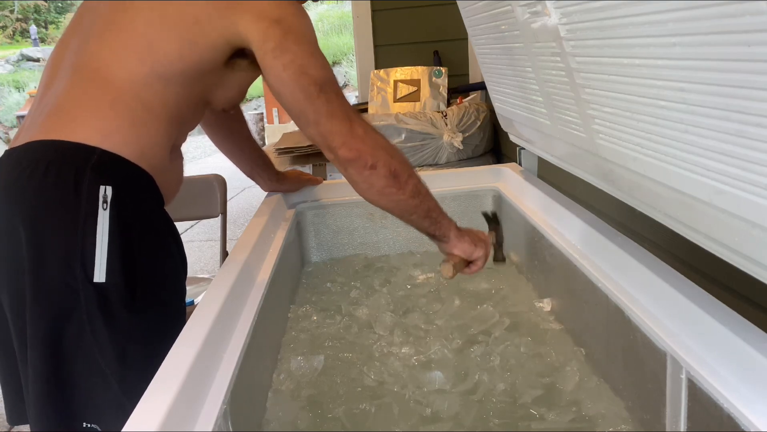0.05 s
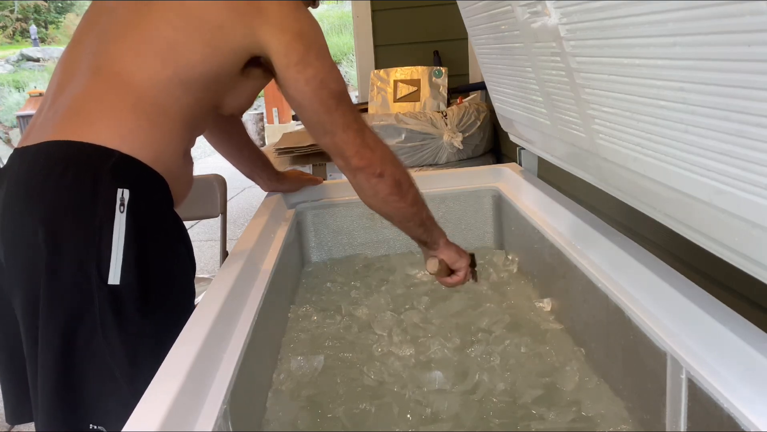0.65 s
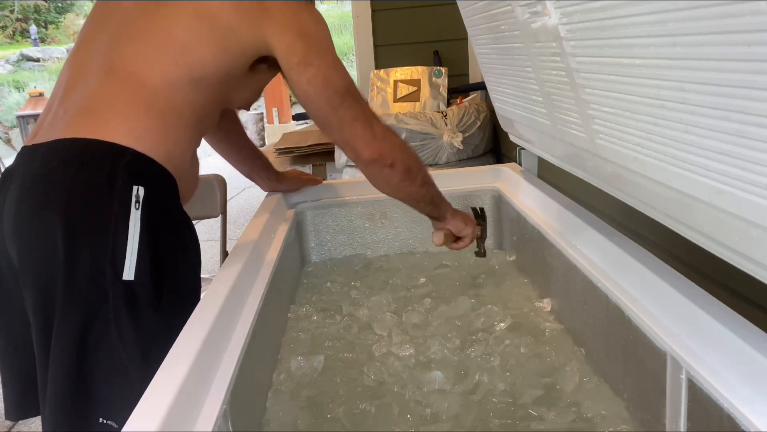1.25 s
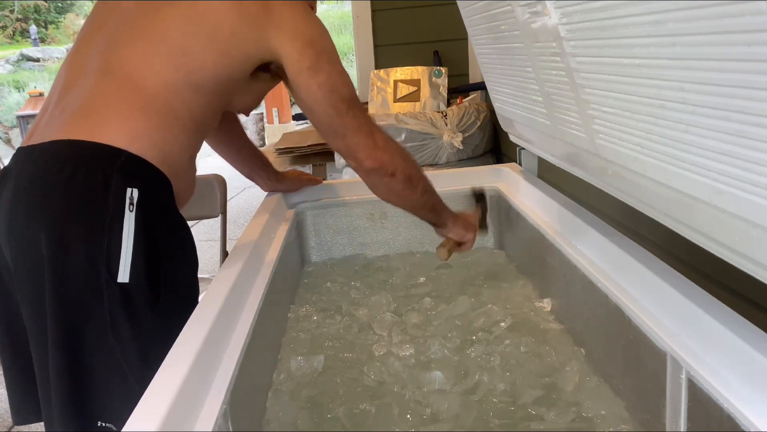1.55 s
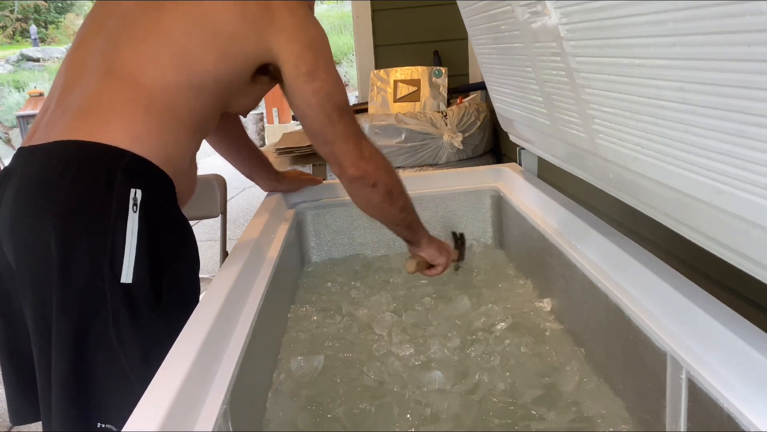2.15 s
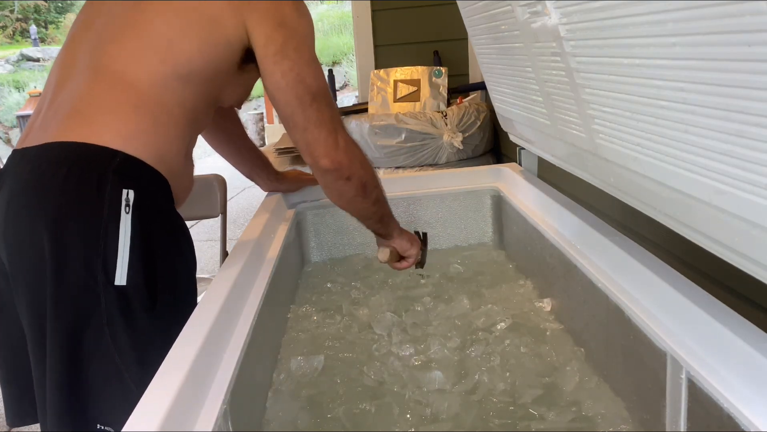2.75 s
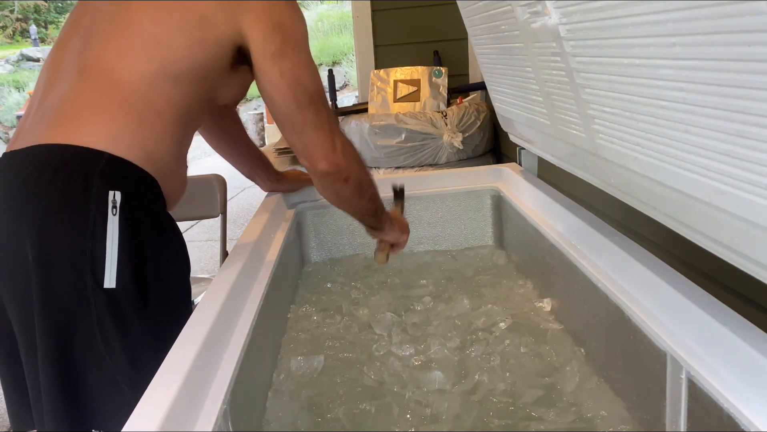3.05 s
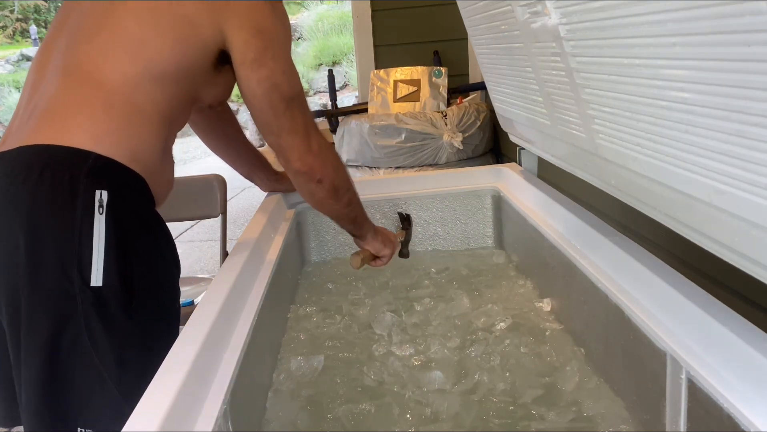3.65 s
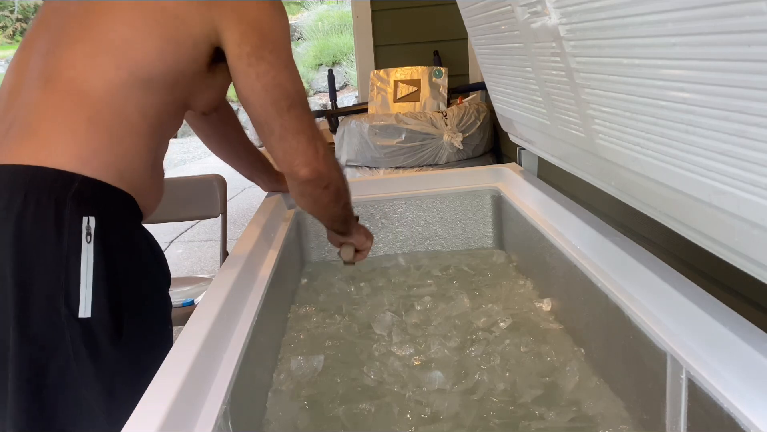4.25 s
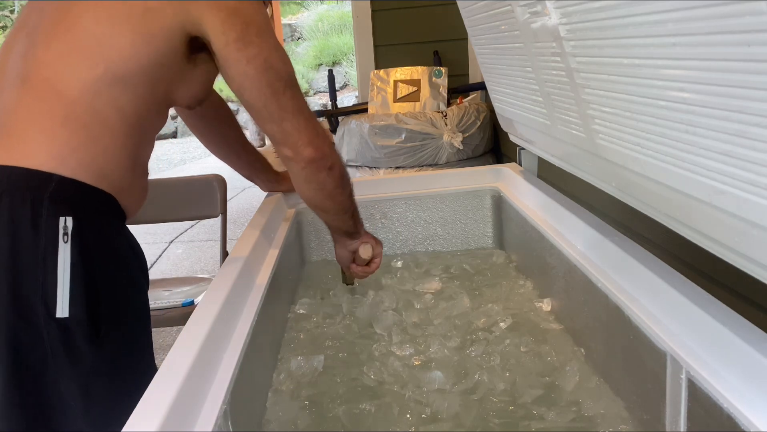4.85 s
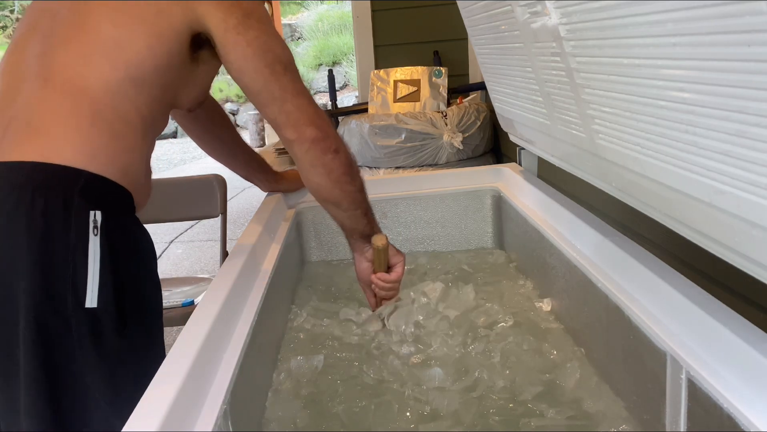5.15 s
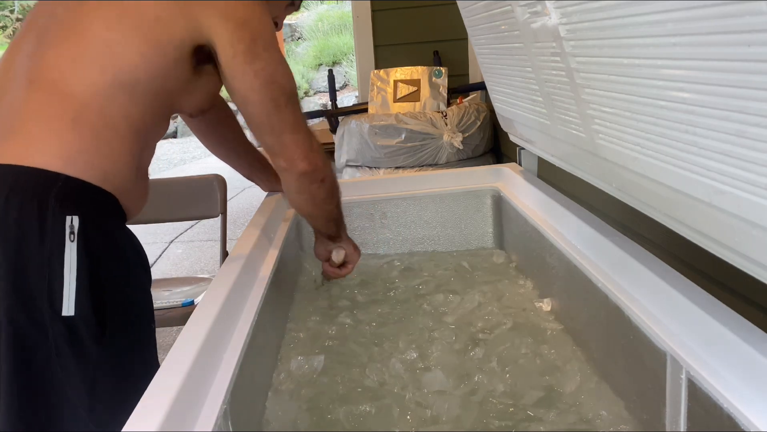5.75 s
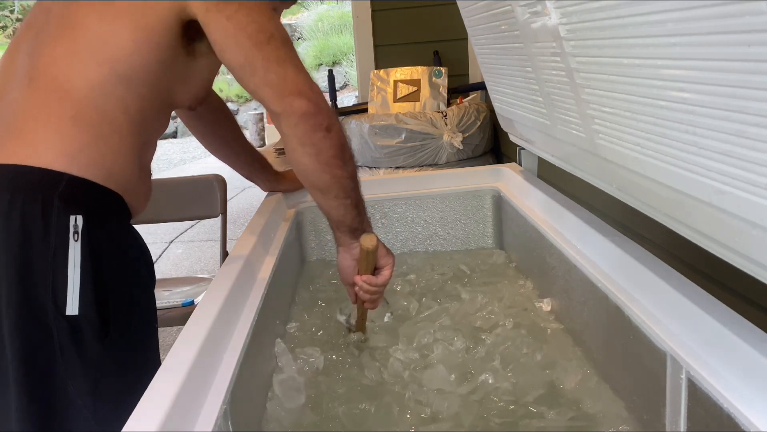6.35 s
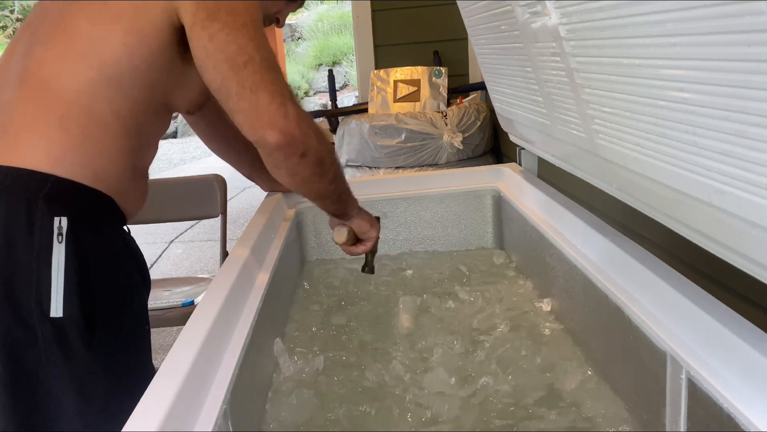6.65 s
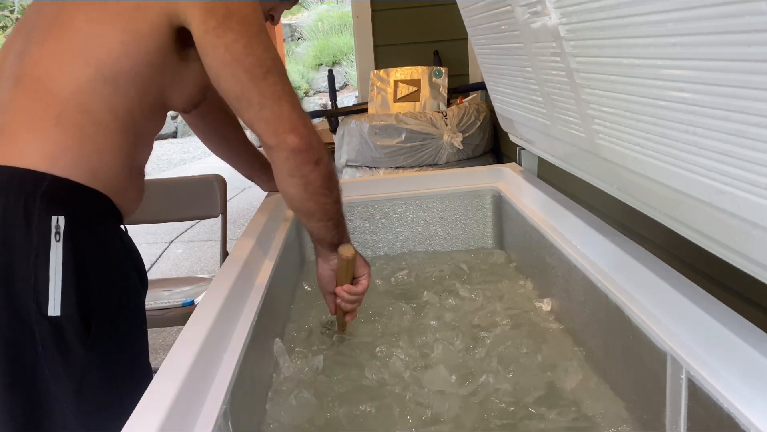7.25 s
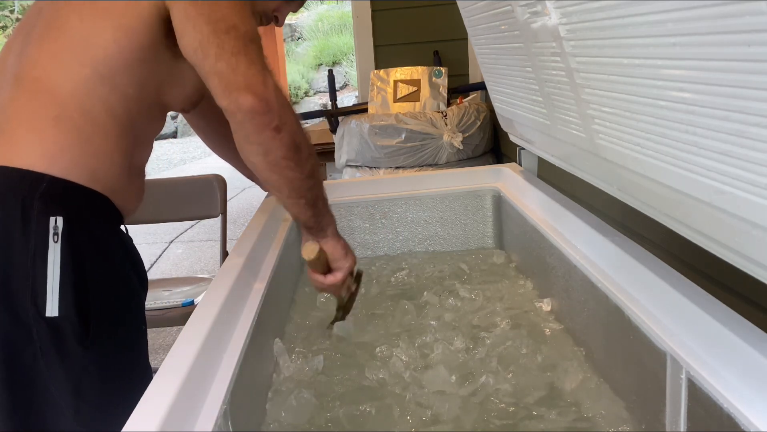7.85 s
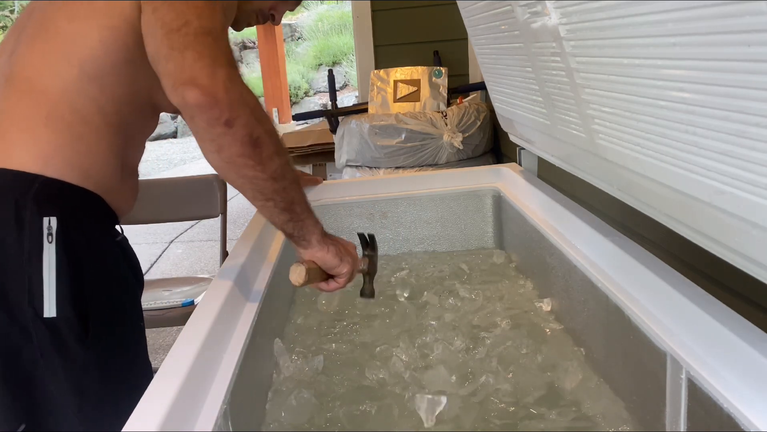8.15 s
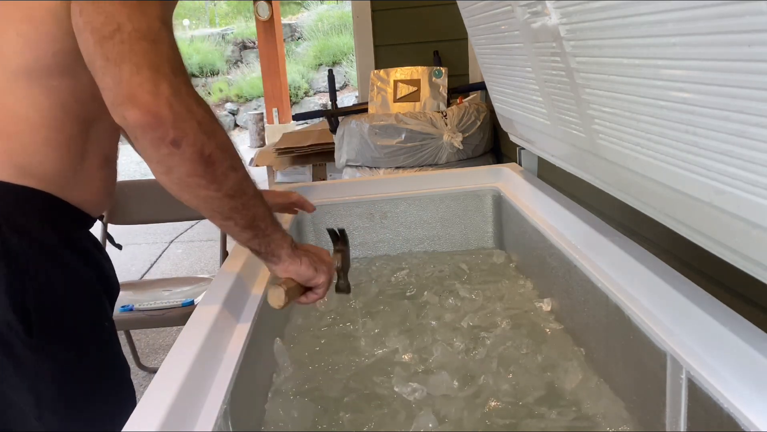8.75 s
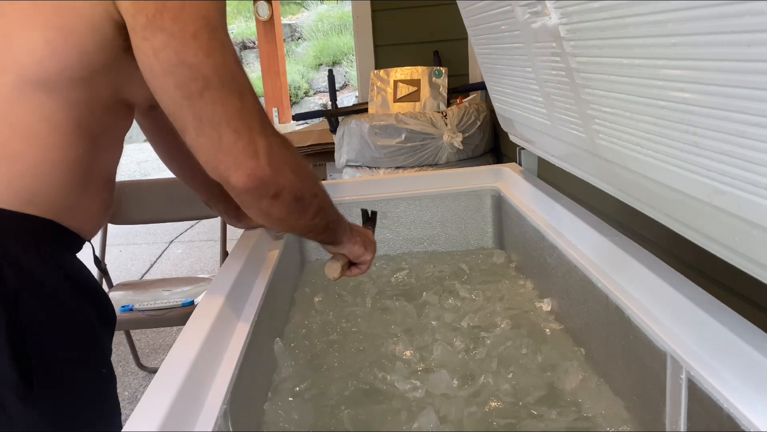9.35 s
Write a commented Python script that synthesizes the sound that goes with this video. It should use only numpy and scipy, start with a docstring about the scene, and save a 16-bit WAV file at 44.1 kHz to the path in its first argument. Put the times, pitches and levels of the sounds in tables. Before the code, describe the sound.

Crunching hammer blows break ice in water with hollow thumps and splashes, give way to gurgling stirring, then resume.

```python
"""A hammer smashes floating ice in a water-filled chest freezer, then stirs and chops through the slush.
Each blow crushes ice and thumps the water; chunks knock together, bubbles ring and spray falls back.
The half-empty chest booms at its own low notes and bounces the other sounds between its walls and
raised lid. Faint outdoor air lies behind it all."""
import sys
import numpy as np
from scipy import signal
from scipy.fft import rfft, irfft, next_fast_len
from scipy.io import wavfile
from scipy.ndimage import uniform_filter1d

SR = 44100
rng = np.random.default_rng(int(sys.argv[2]) if len(sys.argv) > 2 else 0)


def transcribe(signal):
    """Save signal, clipped to [-1, 1], as a 16-bit WAV file at the path in sys.argv[1]."""
    frames = np.atleast_2d(signal).T
    limited = np.clip(frames, -1, 1)
    pcm = np.round(limited * 32767).astype(np.int16)
    wavfile.write(sys.argv[1], SR, pcm)


N = 423801


def undb(db):
    """Turn decibels into a number to multiply by."""
    return 10 ** (np.asarray(db) / 20)


def unit(x):
    """Scale a sound so its average strength (rms) is 1."""
    return x / np.sqrt(np.mean(x ** 2) + 1e-18)


def clock(seconds):
    """The time of each sample in a short sound."""
    return np.arange(int(seconds * SR)) / SR


def add(out, s, sound):
    """Mix in a sound or level curve, starting at s seconds."""
    i = int(np.clip(s * SR, 0, N - 1))
    out[:, i:i + sound.shape[1]] += sound[:, :N - i]


def swell(age, sharpness=1):
    """Rise to 1 at age 1, then die away."""
    return (age * np.exp(1 - age)) ** sharpness


def colour(x, points):
    """Shape a sound's tone with a curve of (frequency [Hz], level [dB]) points."""
    n = x.shape[-1]
    size = next_fast_len(n + 2048, True)
    hz, db = np.transpose(points)
    bins_hz = np.maximum(np.arange(size // 2 + 1) * SR / size, 1)
    gain = undb(np.interp(np.log(bins_hz), np.log(hz), db))
    return irfft(rfft(x, size) * gain, size)[..., :n]


def clicks(n, rate, spread_db):
    """Random clicks, about `rate` a second, many small and a few large."""
    happens = rng.random(n) < rate / SR
    size = np.minimum(rng.exponential(size=n), 4)
    sign = rng.choice([-1, 1], n)
    return unit(happens * sign * undb(spread_db * size))


def steady(x, seconds):
    """Even out slow swells in loudness but keep the quick detail."""
    power = uniform_filter1d(np.mean(x ** 2, axis=0), int(seconds * SR))
    return x / np.sqrt(np.abs(power) + power.mean() / 20)


# Tone of the outdoor air: (frequency [Hz], relative level [dB])
AIR_TONE = [(25, -19), (120, -17), (300, -4.5), (750, -4), (1500, -12), (6000, -13), (16000, -42.5)]


def outdoor_air(air_db=-73):
    """A faint hush, partly the same on the left and the right."""
    noise = rng.standard_normal((2, N)) + rng.standard_normal(N)
    return undb(air_db) * unit(colour(noise, AIR_TONE))


def walls(x, direct_db, early_t60=0.13, late_t60=0.17, late_db=-7, right_db=1.0):
    """Sound arrives directly, off the walls, then from under the lid; t60 is seconds to fade 60 dB."""
    t = clock(.4)
    paths = []
    for gain, lag in ((undb(-right_db), 2), (undb(right_db), 0)):  # left, right; lag in samples
        early = unit(clicks(len(t), 5000, 3) * undb(-60 * t / early_t60) * (t > .0012))
        late = unit(rng.standard_normal(len(t)) * undb(-60 * t / late_t60) * (1 - np.exp(-t / 0.02)))
        path = (early + undb(late_db) * late) / np.sqrt(len(t))
        path[lag] = undb(direct_db) * gain
        paths.append(gain * path / np.linalg.norm(path))
    return signal.oaconvolve(x[None], np.array(paths), axes=1)[:, :N]


# Notes of the chest's air and walls: (pitch [Hz], relative level [dB], time to fade 60 dB [s])
CHEST_NOTES = [(45, -24, 0.27), (75, -13.5, 0.21), (96.9, -3.5, 0.26), (119, 1.5, 0.49), (129.3, 7, 0.18),
               (173, -0.5, 0.25), (186.4, 4, 0.28), (235.4, 4, 0.22), (301.3, -2.5, 0.33), (445, 4, 0.19),
               (461, 9.5, 0.044), (663, 0, 0.13)]


def boom(x, direct=0.17, right_db=3.0, lag_s=0.00077, apart_hz=380, detune=0.011):
    """A push on the water rings the chest's notes, which shift a little as the surface tilts."""
    t = clock(.5)
    notes = [(hz * (1 + detune * rng.standard_normal()), db, t60) for hz, db, t60 in CHEST_NOTES]
    paths = []
    for gain, lag in ((undb(-right_db), 0), (undb(right_db), lag_s)):
        ring = 0
        for hz, db, t60 in notes:
            phase = rng.uniform(-0.52, 1) * hz / apart_hz  # higher notes reach the two sides out of step
            ring += undb(db - 60 * t / t60) * np.cos(2 * np.pi * hz * (t - lag) + phase)
        ring /= np.linalg.norm(ring)
        ring[int(lag * SR)] += direct
        paths.append(gain * ring / np.linalg.norm(ring))
    return signal.fftconvolve(x[None], np.array(paths), axes=1)[:, :N]


def bubble(hz, cycles, glide):
    """Trapped air rings and fades; its pitch slides up if glide is positive, down if negative."""
    t = clock(cycles / hz)
    age = t * hz / cycles
    tone = np.sin(2 * np.pi * hz * t * (1 + glide * age / 2))
    return tone * undb(-50 * age) * (1 - np.exp(-2 * t * hz))


def bubbling(low_hz, high_hz, cycles, spread_db, count, glide=0.2):
    """Bubbles of mixed sizes ring at random times."""
    out = np.zeros((1, N))
    for when, pitch, life, size in rng.random((count, 4)):
        hz = low_hz * (high_hz / low_hz) ** pitch
        gain = hz / low_hz * undb(-spread_db * np.log(size + 0.011))
        add(out, when * N / SR, gain * bubble(hz, cycles * (.5 + life), glide)[None])
    return unit(out[0])


# Tone of drops landing: (frequency [Hz], relative level [dB])
SPRAY_TONE = [(700, -28), (1600, -16), (2600, -3), (3600, -6), (5000, 0.5), (6500, -3.5), (9000, 1),
              (16000, -8.5)]
# Lone drops and ice chips between blows: (time [s], relative level [dB])
DROPS = [(0.466, -37), (.886, -35), (1.313, -32), (2.738, -24), (2.982, -36), (3.32, -36), (3.376, -44),
         (3.638, -24.5), (3.661, -24), (4.287, -28.5), (4.363, -28), (4.449, -32.5)]


def droplets(drop_db=-7, sizzle_s=0.0019):
    """Water and chips flung up by the hammer land one at a time with a bright tick."""
    out, t = np.zeros((2, N)), clock(.05)
    for s, db in DROPS:
        tick = unit(colour(rng.standard_normal(len(t)), SPRAY_TONE)) * np.exp(-t / sizzle_s)
        add(out, s, walls(undb(db + drop_db) * tick, direct_db=-7))
    return out


def trickle(tick_db=1):
    """In calm water, separate drips plink and small chips tick."""
    drips = bubbling(low_hz=2314, high_hz=6200, cycles=44, spread_db=1.5, count=300, glide=0.05)
    ticks = unit(colour(clicks(N, 45, 2.7), SPRAY_TONE))
    return steady(walls(drips + undb(tick_db) * ticks, direct_db=-4), .25)


def patter(rate=30, spread_db=4.0):
    """Heavy drops land one by one, each with a short sizzle."""
    t = clock(.02)
    sizzle = rng.standard_normal(len(t)) * np.exp(-t / 0.003)
    landings = signal.oaconvolve(clicks(N, rate, spread_db), sizzle)[:N]
    return unit(colour(walls(landings, direct_db=-13), SPRAY_TONE))


def jostle(low_hz=1150, high_hz=3000, spread_db=12, count=260):
    """Small chunks bump at random, each with the brief hollow note of its size."""
    out, t = np.zeros((1, N)), clock(.02)
    for when, pitch, size in rng.random((count, 3)):
        hz = low_hz * (high_hz / low_hz) ** pitch
        bump = undb(-spread_db * size) * swell(t * hz) * np.sin(2 * np.pi * hz * t)
        add(out, when * N / SR, bump[None])
    return unit(walls(out[0], direct_db=-5))


# How heave, gurgle and spray settle, a row each: (fade speed [dB/s], boost to the returning wave [dB])
SETTLING = [(140, 2), (109, -1), (100, 3)]
# The hammer dips in or lifts out and slops water: (time [s], relative level [dB], time to peak [s])
DIPS = [(0.0, -56, 0.026), (1.045, -53, 0.047), (6.781, -36, 0.043), (7.834, -36.5, 0.022),
        (8.304, -49, 0.049), (9.09, -60, 0.11), (9.479, -34, 0.086)]
# The hammer drags through slush, one curve a stir: (time [s], heave [dB], gurgle [dB], spray [dB])
STIRS = [
    [(4.84, -48, -65, -43), (4.85, -51, -53, -42.5), (4.952, -38, -40.5, -44.5), (5.022, -36.5, -33.5, -34),
     (5.066, -44, -33, -39.5), (5.126, -35, -36.5, -35), (5.234, -44, -43, -36.5),
     (5.26, -44, -31.5, -41.5), (5.294, -50, -39, -40), (5.306, -49, -32, -38.5),
     (5.416, -46, -47.5, -51.5), (5.46, -68, -50, -52)],
    [(5.56, -40.5, -47, -47), (5.572, -47, -44, -47), (5.644, -34.5, -36, -48), (5.698, -34.5, -41.5, -46),
     (5.708, -32.5, -31, -35.5), (5.778, -30.5, -40, -52), (6.03, -31, -35.5, -37.5),
     (6.15, -30.5, -29, -34), (6.338, -34.5, -40.5, -39.5), (6.418, -45, -48.5, -50),
     (6.51, -44.5, -35, -45), (6.726, -50.5, -58.5, -58), (6.77, -54, -55, -59)],
    [(7.14, -49, -53.5, -52), (7.172, -52, -47, -60), (7.272, -39, -44, -53), (7.304, -40, -51, -60),
     (7.318, -35, -42, -55.5), (7.406, -41.5, -50, -59), (7.488, -41, -46.5, -51),
     (7.526, -24.5, -40.5, -53.5), (7.61, -45, -56, -58.5), (7.692, -55.5, -60.5, -51.5),
     (7.766, -58, -58, -65), (7.8, -59, -65, -66)],
]
# Boost added to every stir: (heave [dB], gurgle [dB], spray [dB])
STIR_BOOST = (3.5, 1.5, 3)


def water_motion(rise_s=0.02, stir_fade_s=0.094):
    """Three loudness curves (heave, gurgle, spray): blows, dips and stirs set the water moving."""
    t, age = np.arange(N) / SR, clock(1)
    power = np.zeros((3, N))
    fade_speed, wave_boost = np.transpose(SETTLING)[:, :, None]
    rise = np.minimum(age / rise_s, 1)
    # BLOWS is listed above hammer(); each blow splashes, then a wave washes back
    for s, *_, hold_s, heave, gurgle, spray, wave_db, return_s, spread_s, _, _ in BLOWS:
        settled_s = np.maximum(age - rise_s - hold_s, 0)
        splash = rise * undb(np.array([[heave], [gurgle], [spray]]) - fade_speed * settled_s)
        wave = undb(wave_db + wave_boost) * rise * np.exp(-((age - return_s) / spread_s) ** 2)
        add(power, s, splash ** 2 + wave ** 2)
    for s, db, peak_s in DIPS:
        slop = undb(db) * swell(age / peak_s, sharpness=1.05)
        add(power, s, slop[None] ** 2)
    for stir in STIRS:
        times, *levels = np.transpose(stir)
        fade = np.exp(-np.abs(t - np.clip(t, times[0], times[-1])) / stir_fade_s)
        stir_db = [np.interp(t, times, level) + boost for level, boost in zip(levels, STIR_BOOST)]
        power += (fade * undb(stir_db)) ** 2
    return np.sqrt(power)


# Tones of heaving water, gurgling water and grinding slush: (frequency [Hz], relative level [dB])
HEAVE_TONE = [(20, -33), (50, -9), (110, -1), (250, -1.5), (450, -6.5), (800, -6.5), (1500, -34)]
GURGLE_TONE = [(250, -11), (500, 1.5), (830, 2.5), (1300, 2.5), (1700, -10.5), (2300, -8.5), (3200, 1),
               (5000, -58.5)]
SLUSH_TONE = [(900, -21), (1700, -2.5), (2200, 2), (2900, 4.5), (3600, -10), (6000, -33)]


def water(heave_db=-8, gurgle_db=-6, spray_db=-5, slush_db=-9, fizz_db=-7, glug_db=-6, grit_db=-3,
          plink_db=-15, jostle_db=-14, patter_db=-11, calm_db=-56.5):
    """Water heaves against the walls, gurgles between chunks, grinds the slush and falls as spray."""
    heave, gurgle, spray = water_motion()
    glugs = bubbling(low_hz=171.2, high_hz=400.6, cycles=28, spread_db=4.5, count=700, glide=-0.12)
    glugs = walls(glugs, direct_db=-1.5)
    surge = unit(colour(boom(clicks(N, 600, 2.7)), HEAVE_TONE)) + undb(glug_db) * glugs
    froth, drops, slush, plinks = 0, 0, 0, 0
    for _ in range(2):  # two spots in the chest
        pockets = bubbling(low_hz=565.5, high_hz=2370, cycles=28.3, spread_db=3, count=1000)
        froth += walls(pockets + undb(grit_db) * clicks(N, 500, 3.5), direct_db=-12)
        fizz = bubbling(low_hz=2112, high_hz=7580, cycles=42, spread_db=3, count=1700)
        drops += walls(clicks(N, 550, 3.3) + undb(fizz_db) * fizz, direct_db=-11.5, right_db=-0.1)
        slush += walls(clicks(N, 160, 5.7), direct_db=-5.5)
        drips = bubbling(low_hz=1286, high_hz=5110, cycles=21, spread_db=0.5, count=220, glide=0.044)
        plinks += walls(drips, direct_db=-4.5)
    # as the water calms, the hiss of spray breaks up into a trickle
    calm = undb(calm_db) / (undb(calm_db) + spray)
    hiss = steady(colour(drops, SPRAY_TONE), 0.29)
    falling = np.sqrt(1 - calm) * hiss + np.sqrt(calm) * trickle()
    # ice rubs and bumps, and drops plink, most when the water both gurgles and sprays
    churn = np.sqrt(gurgle * spray)
    grinding = steady(colour(slush, SLUSH_TONE), 0.22)
    small_bits = undb(slush_db) * grinding + undb(plink_db) * unit(plinks) + undb(jostle_db) * jostle()
    return (undb(heave_db) * heave * steady(surge, 0.13)
            + undb(gurgle_db) * gurgle * steady(colour(froth, GURGLE_TONE), 0.086)
            + churn * small_bits
            + spray * (undb(spray_db) * falling + undb(patter_db) * patter()))


# The biggest single bubbles: (time [s], relative level [dB], starting pitch [Hz])
BIG_BUBBLES = [(0.231, -27, 3030), (.335, -37.5, 131), (.65, -22, 850), (.822, -37.5, 716),
               (1.14, -21.5, 252), (1.606, -22, 824), (1.72, -28.5, 860), (2.18, -24, 3030),
               (2.615, -22, 875), (2.897, -33.5, 590), (3.087, -4, 485), (3.092, -18.5, 605),
               (3.105, -18, 244.5), (3.126, -16.5, 1020), (3.161, -16, 1033), (4.106, -11.5, 377),
               (4.112, -18.5, 247), (4.629, -17, 263), (5.16, -31.5, 125), (5.19, -18.5, 2210),
               (5.636, -18.5, 260), (5.76, -23.5, 810), (5.82, -21, 810), (5.931, -16.5, 340),
               (5.965, -20.5, 835), (6.03, -18, 244), (6.075, -18, 308), (6.13, -28, 820),
               (6.146, -20, 1030), (6.49, -26, 835), (6.837, -18.5, 682), (6.841, -9, 326),
               (6.867, -13.5, 463), (6.895, -21.5, 540), (6.905, -16.5, 305), (6.976, -18, 233),
               (6.986, -18, 114), (7.252, -21.5, 319), (7.343, -24, 312), (7.385, -27, 174),
               (7.425, -24, 325), (7.503, -27.5, 850), (7.521, -31, 486), (7.532, -13, 231.5),
               (7.877, -13, 335), (7.885, -22, 115), (8.885, -21, 254), (8.909, -17, 120),
               (8.99, -20.5, 128.7), (9.104, -21, 460), (9.17, -27.5, 113)]


def gulps(shallow_db=-1, deep_db=-19, deep_below_hz=500):
    """Air dragged under forms bubbles: shallow ones chirp up, deep ones slide down and ring the chest."""
    out = np.zeros((2, N))
    for s, db, hz in BIG_BUBBLES:
        if hz < deep_below_hz:
            add(out, s, boom(undb(db + deep_db) * bubble(hz, cycles=24, glide=-0.32), direct=1.7))
        else:
            add(out, s, walls(undb(db + shallow_db) * bubble(hz, cycles=30, glide=0.077), direct_db=-6))
    return out


# The loudest knocks of ice on ice: (time [s], relative level [dB], pitch [Hz], relative grit level [dB])
KNOCKS = [(0.1503, -9.5, 980, -26), (0.181, -17, 1260, -48), (0.6221, -6, 1170, -17),
          (0.63, -17, 1340, -33), (0.7602, -21, 1190, -47), (1.1447, -23, 2360, -11),
          (1.611, -23, 2400, -18), (2.159, -21, 1420, -23), (2.175, -12.5, 4970, -45),
          (2.6302, -17, 3180, -21), (3.2417, -2.5, 2000, -23), (3.622, -25, 2600, -27),
          (3.7296, -23, 2010, -29), (4.159, -22, 2260, -33), (4.6248, -9, 1360, -27),
          (4.661, -9.5, 2380, -32), (4.6967, -17, 2220, -18.5), (4.7062, -10, 2140, -21),
          (4.721, -17, 2110, -33), (4.7728, -16.5, 2120, -35), (4.803, -20, 2200, -38),
          (5.287, -18, 1970, -36), (5.342, -18, 2320, -29), (5.4828, -23.5, 1700, -23.5),
          (5.5758, -9, 2010, -22), (5.6234, -26, 2880, -17), (5.7069, -6, 2240, -12),
          (5.8191, -14, 1760, -27), (5.8521, -15, 2840, -19), (5.973, -13, 2530, -26),
          (6.089, -14, 2110, -20), (6.112, -11, 1850, -26), (6.196, -12.5, 2460, -31),
          (6.317, -12, 2010, -20.5), (6.367, -20.5, 1470, -42), (6.791, -21.5, 2430, -50),
          (6.9543, -18.5, 2900, -22.5), (7.058, -28.5, 2960, -47), (7.114, -26, 2380, -28.5),
          (7.9977, -17, 2060, -29), (8.02, -13, 2180, -20.5), (8.095, -25.5, 2660, -30.5),
          (8.161, -30, 2400, -35), (8.2206, -27.5, 2740, -33), (8.388, -10, 2360, -14),
          (8.3935, -7.5, 1290, -12), (8.435, -21, 2320, -24), (8.94, -15, 1970, -17),
          (8.958, -17, 1350, -13.5), (9.167, -24.5, 2220, -42), (9.5185, -14.5, 2450, -43),
          (9.5562, -15, 1930, -41)]


def ice_knocks(knock_db=-6, grit_db=-3, grit_s=0.0043, rebound_db=-8, rebound_s=0.002196,
               overtone_db=-15):
    """Floating blocks collide and rock back: two hollow clacks with a gritty edge."""
    out, t = np.zeros((2, N)), clock(.03)
    for s, db, hz, grit in KNOCKS:
        rebound_age = np.maximum(t - rebound_s * rng.uniform(.5, 1.5), 0)
        cycles_to_peak = 0.82 * rng.uniform(.6, 1.35)
        overtone = rng.uniform(1.3, 2.2)  # times the block's pitch
        clacks = 0
        for age, gain in ((t, 1), (rebound_age, undb(rebound_db))):
            phase = 2 * np.pi * hz * age
            tone = np.sin(phase) + undb(overtone_db) * np.sin(overtone * phase)
            clacks += gain * swell(age * hz / cycles_to_peak) * tone
        edge = rng.standard_normal(len(t)) * np.exp(-t / grit_s) * (1 - np.exp(-t / .0009))
        knock = undb(db + knock_db) * clacks + undb(grit + grit_db) * edge
        bass_cut = signal.butter(8, hz * 0.57, "high", fs=SR, output="sos")  # the block's lowest note
        add(out, s, walls(signal.sosfilt(bass_cut, knock), direct_db=-1, early_t60=.08, late_db=-8))
    return out


def plunge(t, start_hz=420, end_hz=140, open_s=0.0293, fade_s=0.068):
    """The air pocket behind the hammer head widens, so its hollow note falls."""
    hz = end_hz + (start_hz - end_hz) * np.exp(-t / open_s)
    wobble = 1 + unit(uniform_filter1d(rng.standard_normal(len(t)), size=300))
    return wobble * np.sin(2 * np.pi * np.cumsum(hz) / SR) * np.exp(-t / fade_s)


# Notes of a splitting ice slab: (pitch [times the snap pitch], relative level [dB])
SLAB_NOTES = [(1, 3.5), (1.42, -13.5), (2.1, -10.5)]
# Bright tone of cracking ice: (frequency [Hz], relative level [dB])
CRACK_TONE = [(1500, -62), (3000, -3), (4500, 4), (6500, 3.5), (9000, 6.5), (16000, 2.5)]


def snap(hz, ring_s=0.0012, snap_db=-5, edge_db=-3):
    """The slab splits under the hammer with one brittle, briefly ringing crack."""
    t = clock(.02)
    fade = np.exp(-t / ring_s)
    ring = sum(undb(db) * np.sin(2 * np.pi * (hz * ratio * t + rng.random())) for ratio, db in SLAB_NOTES)
    edge = undb(edge_db) * unit(colour(rng.standard_normal(len(t)), CRACK_TONE)) * fade
    return walls(undb(snap_db) * (ring * (1 - np.exp(-t * hz)) + edge) * fade, direct_db=4.5)


# Tones of crushed ice, thumped water and the shuddering chest: (frequency [Hz], relative level [dB])
CRUNCH_TONE = [(250, -11.5), (550, 1.5), (750, 1), (1150, -2), (1650, -5), (2400, -2.5), (3300, -17.5),
               (5000, -55)]
THUMP_TONE = [(50, -41), (120, 3), (220, 18), (450, -30), (700, 11), (1200, -12.5)]
RUMBLE_TONE = [(18, -34.5), (40, -7), (80, 5), (160, -21.5), (400, -30)]
# Hammer blows and their splashes, with relative levels: (time [s], crunch [dB], crack [dB], thump [dB],
# crush fade [s], splash hold [s], heave [dB], gurgle [dB], spray [dB], returning wave [dB],
# wave delay [s], wave spread [s], snap [dB], snap pitch [Hz])
BLOWS = [(0.080, -16.5, -24.5, -35, 0.0075, 0.075, -34.5, -32.5, -41, -53.5, 0.16, 0.31, -18, 1300),
         (0.59, -10, -16.5, -40, 0.0031, 0.024, -29, -30, -32.5, -51.5, 0.25, 0.15, -14.5, 5060),
         (1.133, -7, -17.5, -27, 0.0064, 0.0037, -36, -46.5, -41.5, -63.5, 0.22, 0.17, -10.5, 2420),
         (1.576, -11.5, -19, -26.5, 0.0074, 0.048, -32.5, -32.5, -35.5, -48, 0.31, 0.23, -23, 2690),
         (2.108, -16, -31.5, -30, 0.0089, 0.066, -30.5, -33, -37.5, -50, 0.15, 0.33, -36, 1400),
         (2.611, -17.5, -18, -28, 0.0094, 0.086, -38.5, -39.5, -44.5, -54.5, 0.21, 0.26, -22, 4600),
         (3.084, -9.5, -18, -20, 0.0081, 0.069, -28, -32, -35, -52.5, 0.22, 0.25, -14.5, 3030),
         (3.566, -13.5, -18, -28, 0.0046, 0.0059, -30.5, -62, -44, -50.5, 0.16, 0.17, -19, 6200),
         (4.0998, -12, -26.5, -23.5, 0.0066, 0.0076, -28, -42.5, -34, -64, 0.25, 0.17, -18, 2190),
         (4.6023, -6.5, -19.5, -26.5, 0.0056, 0.094, -29, -37.5, -40.5, -57, 0.2, .12, -11.5, 2310),
         (6.833, -16.5, -50, -28.5, 0.024, 0.044, -21.5, -33, -57, -46, 0.13, 0.11, -22, 500),
         (7.870, -14, -24.5, -20.5, 0.0053, 0.0053, -32, -62, -41.5, -53, 0.24, 0.2, -18, 1510),
         (8.341, -13, -20, -23.5, 0.0044, 0.063, -27.5, -30, -28.5, -49.5, 0.18, 0.27, -20, 2400),
         (8.877, -15, -23.5, -26, 0.0092, 0.039, -22.5, -34, -34, -42, 0.27, 0.07, -20, 2850),
         (9.572, -16.5, -31, -38, 0.016, .03, -17, -27, -42, -50, 0.29, .12, -25, 2200)]


def hammer(crunch_db=-12, crack_db=1, thump_db=-13, plunge_db=-16, rumble_db=-19, lead_in_db=-9,
           thump_s=0.026, rumble_s=0.12, lead_in_s=0.0039, early_s=.012):
    """The head splits a slab, crushes it in many tiny breaks and shoves the water; the chest shudders."""
    out, t = np.zeros((2, N)), clock(.4)
    age = t - early_s
    # the crunch swells briefly just before the snap
    lead_in = undb(lead_in_db) * np.exp(-np.abs(age) / lead_in_s)
    attack = 1 - np.exp(-t / .0009)
    for s, crunch, crack, thump, crush_s, *_, snap_db, snap_hz in BLOWS:
        breaks = clicks(len(t), 5000, 3.9)
        ice = undb(crunch + crunch_db) * unit(colour(breaks, CRUNCH_TONE))
        ice += undb(crack + crack_db) * unit(colour(breaks, CRACK_TONE))
        crushing = np.where(age < 0, lead_in, np.exp(-np.abs(age) / crush_s))
        add(out, s - early_s, walls(ice * crushing, direct_db=-7))
        add(out, s, undb(snap_db) * snap(snap_hz))
        shove = unit(colour(rng.standard_normal(len(t)), THUMP_TONE)) * np.exp(-t / thump_s)
        push = undb(thump + thump_db) * shove + undb(thump + plunge_db) * plunge(t)
        add(out, s, boom(push * attack, direct=6.2))
        rumble = unit(colour(rng.standard_normal((2, len(t))) + rng.standard_normal(len(t)), RUMBLE_TONE))
        add(out, s, undb(thump + rumble_db) * rumble * t / rumble_s * np.exp(1 - 2 * t / rumble_s))
    return out


def scene():
    """Hammer, ice and water in the chest, in quiet outdoor air."""
    return hammer() + ice_knocks() + gulps() + water() + droplets() + outdoor_air()


# How strongly the microphone picks up lows and highs: (frequency [Hz], gain [dB])
MICROPHONE_TONE = [(30, 6), (6500, 9), (8000, -1.5), (9600, -12), (11500, -11.5), (13500, -32.5),
                   (15000, -15.5), (16000, -24)]


def record(dry, bottom_hz=34, top_hz=16200):
    """The microphone dulls the treble; the deepest bass and the very top are cut away."""
    bass_cut = signal.butter(2, bottom_hz, "high", fs=SR, output="sos")
    top_cut = signal.ellip(8, .2, 70, top_hz, fs=SR, output="sos")
    return signal.sosfilt(top_cut, signal.sosfilt(bass_cut, colour(dry, MICROPHONE_TONE)))


dry = scene()
out = record(dry)
transcribe(out)
```